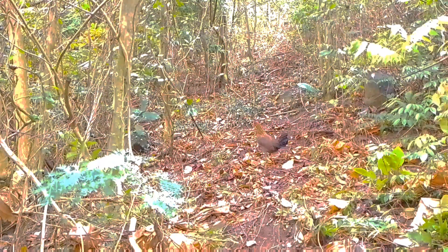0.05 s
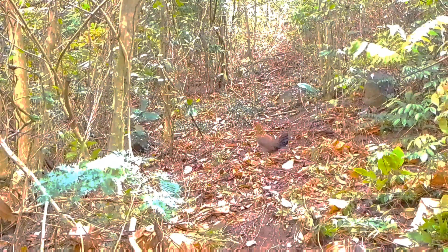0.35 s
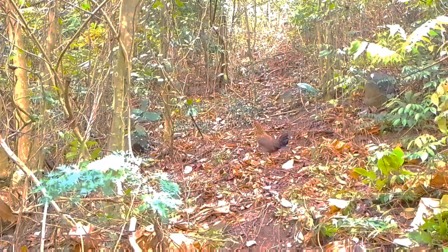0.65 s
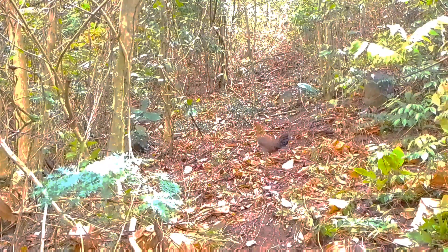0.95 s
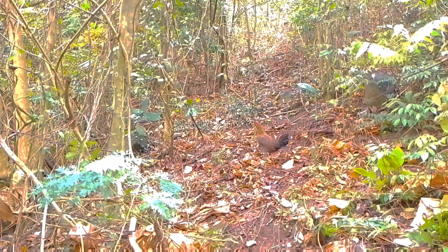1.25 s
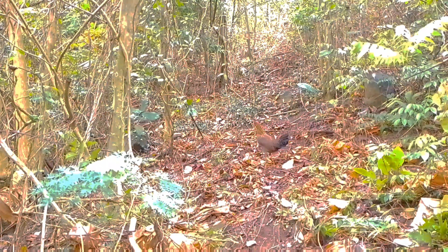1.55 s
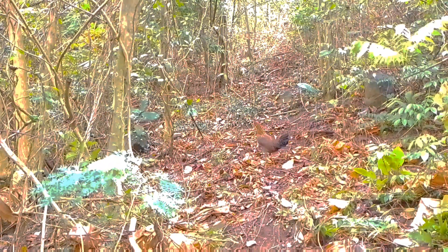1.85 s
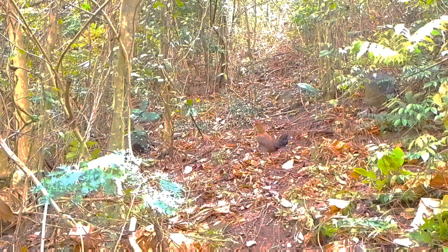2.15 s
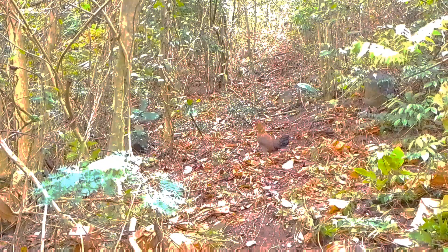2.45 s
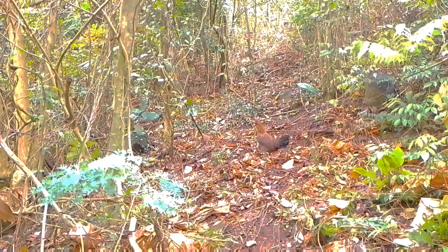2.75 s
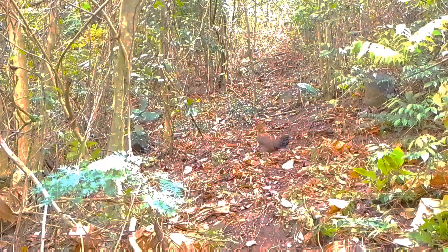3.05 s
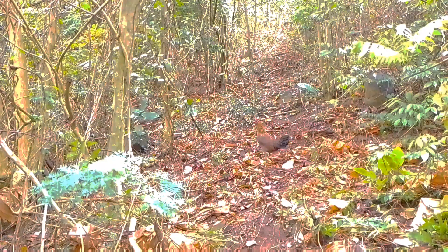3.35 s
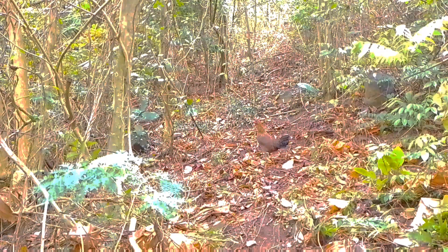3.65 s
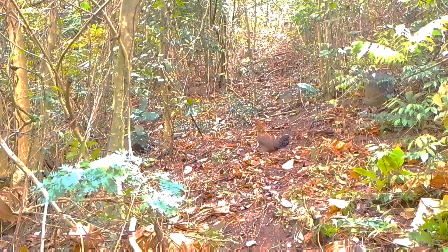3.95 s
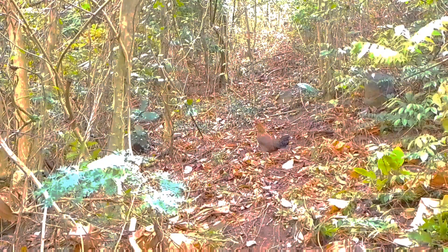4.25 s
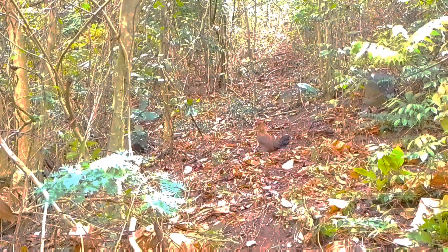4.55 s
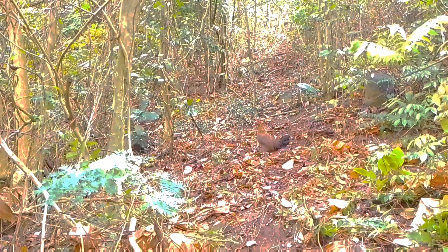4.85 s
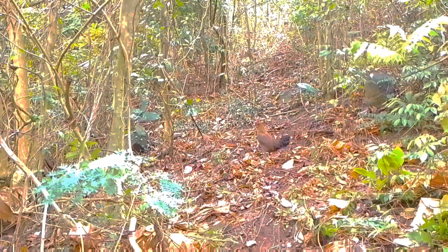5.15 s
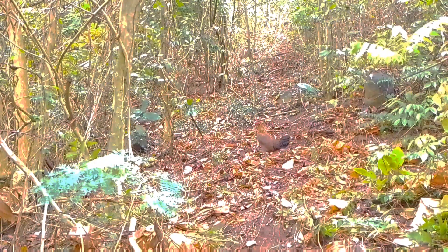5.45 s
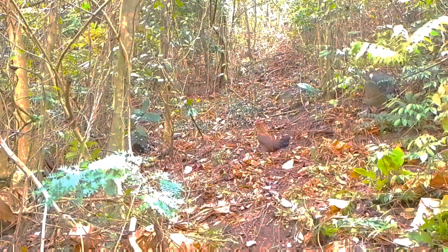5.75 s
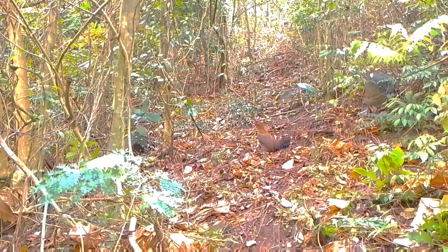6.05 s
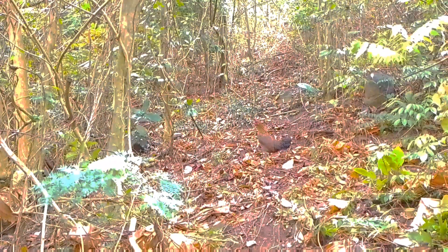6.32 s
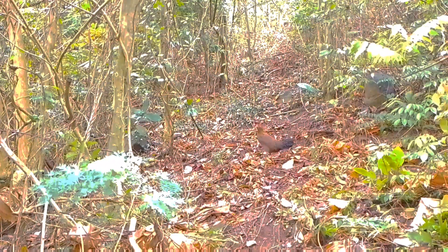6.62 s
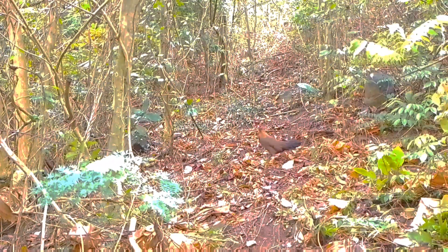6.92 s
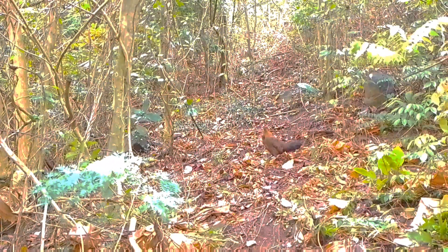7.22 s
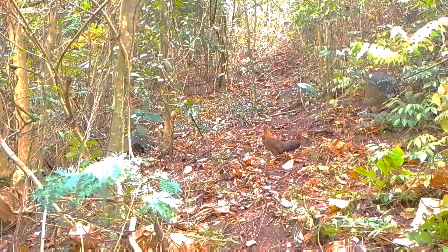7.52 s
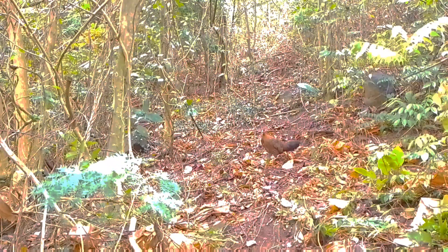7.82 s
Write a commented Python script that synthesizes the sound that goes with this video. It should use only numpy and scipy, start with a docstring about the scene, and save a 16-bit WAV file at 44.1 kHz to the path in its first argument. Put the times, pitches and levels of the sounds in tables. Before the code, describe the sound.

In a quiet forest, dry leaves tick softly and distant little birds give rising and falling whistles. Then a nearby junglefowl squeaks, swells from a whine to a hoarse scream lasting about a second, and runs on into loud, raspy cackling, fast at first and then more spaced out. The trees scatter the calls slightly, and a soft, even hush continues underneath.

```python
"""A junglefowl squeaks, draws a whine out into a harsh scream, then breaks into rapid, rasping
cackles that slow down. Small birds whistle farther off and dry leaves tick over a steady forest hush.
Scream and cackles are membrane pulses and chopped air, shaped by throat and beak. Squeak and whistles
are sine glides; leaves and hush are filtered noise. The trees scatter every call."""
import sys
import numpy as np
from scipy import signal
from scipy.fft import rfft, irfft, next_fast_len
from scipy.io import wavfile
from scipy.ndimage import map_coordinates

SR = 44100
rng = np.random.default_rng(int(sys.argv[2]) if len(sys.argv) > 2 else 0)


def inscribe(sig):
    """Save sig as 16-bit PCM at rate SR to the path in sys.argv[1].

    A 1-D sig is mono; a 2-D sig holds one channel per row.
    Samples are clipped to [-1, 1] before scaling.
    """
    pcm = np.round(np.clip(np.atleast_2d(sig).T, -1, 1) * 32767)
    wavfile.write(sys.argv[1], SR, pcm.astype(np.int16))


N = 356328

# Each row: time in seconds, pitch in Hz, relative level in dB, roughness (capped at 1 in use).
SCREAM_CONTOUR = [(4.6, 800, -36, 0.4), (4.625, 772.4, -33, 0.3), (4.705, 747.7, -25.5, 0.22),
                  (4.735, 781.4, -21, 0.18), (4.85, 807, -19.5, 0.16), (4.97, 841.8, -15.5, 0.45),
                  (5.1, 867, -13.5, 0.8), (5.2, 831, -12.5, 1.13), (5.49, 841, -11.5, 1.11),
                  (5.52, 820, -36, 1.25)]
# Extra pushes of air in the scream. Each row: centre in seconds, length in seconds, boost in dB.
SCREAM_SURGES = [(5.217, 0.0395, 5.5), (5.373, 0.0602, 4)]
# Each row: start in seconds, length in seconds, relative level in dB,
# onset pitch in Hz, settled pitch in Hz (both before the arch).
CACKLES = [(5.492, 0.063, -14.5, 889.5, 810), (5.553, 0.045, -12, 892, 791), (5.599, .045, -13, 844, 784.5),
           (5.643, 0.049, -14, 892, 796), (5.693, .059, -15.5, 911, 776), (5.751, 0.041, -11.5, 740, 832),
           (5.789, 0.058, -17, 745, 729), (5.837, 0.06, -16.5, 856, 787), (5.898, 0.046, -11, 855, 799),
           (5.947, 0.042, -13.5, 908, 796), (5.998, 0.04, -11.5, 840, 834), (6.036, 0.054, -19.5, 819, 774),
           (6.101, 0.046, -15, 872, 754), (6.18, 0.044, -15, 877, 713), (6.241, 0.039, -17.5, 757, 708),
           (6.302, 0.042, -14, 916, 789), (6.365, 0.033, -20, 802, 757), (6.416, 0.044, -18, 782, 728),
           (6.542, 0.048, -15.5, 821, 806), (6.662, 0.052, -17.5, 697, 755), (6.777, .068, -15.5, 857, 733),
           (6.919, 0.061, -17.5, 865, 699), (7.051, 0.071, -16.5, 901, 714), (7.196, 0.053, -18, 801, 688),
           (7.306, 0.048, -18, 842, 683), (7.432, 0.054, -15, 958, 762), (7.565, .054, -16, 970, 743.4),
           (7.699, 0.064, -16, 935, 715.5), (7.846, 0.061, -14, 1031, 854.5),
           (8.005, 0.06, -13.5, 980, 927)]
# Course of one cackle. Each row: fraction of its length, gain in dB, roughness factor.
CACKLE_SHAPE = [(0, -10, .45), (.08, -1.5, .85), (.2, .5, .8), (.45, 1, .45), (.78, -.5, 1.3), (1, -9, 1.3)]
# Each row: time in seconds, base roughness of a cackle starting then.
CACKLE_ROUGHNESS = [(5.5, 0.83), (6.03, 1.07), (6.12, 0.71), (6.7, 0.62), (7.06, 0.78), (7.3, 0.6),
                    (7.7, 0.63), (7.87, 1.17)]
# Fixed throat response. Each row: frequency in Hz, gain in dB.
THROAT_RESPONSE = [(150, -60), (420, -35), (650, -19.5), (780, -19.5), (1000, -18.5), (1230, -13.5),
                   (1430, -4.5), (1680, .5), (2130, -4.5), (2500, -15.5), (3300, -12.5), (9000, -20),
                   (15000, -26)]
# Tuning by the beak opening. Each row: time in seconds, resonance in Hz.
BEAK_RESONANCE = [(4.65, 5150), (5.05, 4720), (5.3, 4420), (5.75, 4330), (6.14, 3420), (6.6, 3120),
                  (6.81, 3880), (6.95, 4480), (7.08, 4720), (7.22, 4460), (7.6, 4360), (7.87, 4860)]
# Mouth response, beak at rest. Each row: multiple of the beak resonance, gain in dB.
MOUTH_RESPONSE = [(.6, -0.5), (.88, -0.5), (1.04, 2.5), (1.12, -18.5), (1.22, -22.5), (1.37, -5.5),
                  (1.56, -21), (1.83, -11.5), (2.3, -19.5), (2.9, -30.5)]
# Each row: start in seconds, length in seconds, level in dB, start, middle and end pitch in Hz.
SQUEAK_GLIDES = [(4.531, 0.056, -36.5, 3150, 3250, 3300), (4.576, .056, -28.5, 2950, 2550, 1500),
                 (4.604, 0.083, -30.5, 2337, 2300, 2140), (4.555, 0.14, -48.5, 5650, 5560, 5250)]
# Small birds' notes. Each row: start in seconds, length in seconds, level in dB before the fade.
RISE_NOTES = [(.47, .24, -44.5), (1.28, 0.27, -45), (2.09, 0.29, -43.5), (3, 0.28, -46), (3.92, .28, -44),
              (6.84, .3, -47.5)]
SLUR_NOTES = [(.27, .15, -38.5), (.78, .17, -43), (.95, .11, -49.5), (1.32, 0.16, -43), (1.8, 0.17, -47.5),
              (2.67, .1, -52), (2.79, .11, -56), (3.32, 0.1, -47.5), (3.86, .1, -49.5)]
CHIP_NOTES = [(.22, 0.065, -41.5), (1.02, 0.072, -44), (1.86, 0.078, -45.5), (2.765, 0.049, -41.5),
              (3.7, .08, -46), (7.91, 0.068, -45)]
# Each row: start in seconds, relative level in dB.
LEAF_TICKS = [(0.5605, -45), (1.5853, -39), (3.443, -43), (4.0741, -41)]
# Each row: frequency in Hz, relative spectral density in dB.
HUSH_SPECTRUM = [(25, -35.5), (60, -13.5), (110, -13), (165, -24.5), (215, -6), (380, -1), (600, -5),
                 (2700, -4.5), (4000, -12), (6000, -23.5), (9000, -32), (12500, -45)]
# Tail from the far trees. Each row: frequency in Hz, 60 dB decay time in seconds.
TREE_DECAY = [(1700, 0.43), (3500, 0.47), (9000, 0.55)]


def junglefowl(scream_db=10, cackle_db=13):
    """One scream, then a cackle per push of air, all through one vocal tract."""
    source = np.zeros(N)
    add(source, SCREAM_CONTOUR[0][0], amp(scream_db) * scream())
    for row in CACKLES:
        add(source, row[0], amp(cackle_db) * cackle(*row))
    return vocal_tract(source)


def scream(quaver=0.0399, flutter_db=1.0, crack_hz=271.5, lift_hz_per_db=14, clearing_per_db=.11):
    """A whine swells, turns hoarse and cracks upward once; extra pushes of air lift and clear it."""
    t = np.arange(SCREAM_CONTOUR[0][0], SCREAM_CONTOUR[-1][0], 1 / SR)
    pitch_hz, level_db, rough = curves(SCREAM_CONTOUR, t)
    push_db = sum(db * bump(t, centre_s, length_s) for centre_s, length_s, db in SCREAM_SURGES)
    crack = np.minimum(2 * bump(t, centre_s=4.985, length_s=.03), 1)
    rough = np.clip(rough - clearing_per_db * push_db, 0, 1)
    pitch_hz = pitch_hz + lift_hz_per_db * push_db + crack_hz * crack
    pitch_hz *= 1 + quaver * rough ** 2 * wobble(90, len(t))
    level_db = level_db + push_db + flutter_db * rough * wobble(69.2, len(t))
    return amp(level_db) * syrinx(pitch_hz, rough)


def cackle(start_s, length_s, level_db, onset_hz, settled_hz, settle_s=.009, release_s=.018):
    """One push of air: the pitch settles, arches and sags as the air runs out."""
    t = np.arange(SR // 10) / SR
    rough, = curves(CACKLE_ROUGHNESS, start_s)
    spent = np.minimum(t / length_s, 1)
    settling_hz = (onset_hz - settled_hz) * np.exp(-(t / settle_s) ** 2)
    arch_hz = -720.2 * (spent - .42) ** 2
    swell_db, strain = curves(CACKLE_SHAPE, spent)
    fade = np.exp(-np.maximum(t - length_s, 0) / release_s)
    return amp(level_db + swell_db) * fade * syrinx(settled_hz + settling_hz + arch_hz, rough * strain)


def syrinx(pitch_hz, rough, jitter=.055, beat_depth=.85, beat_hz=310, rasp=1.1, leak=.13):
    """Membrane pulses; driven hard, they stumble and chop the air into a rasp."""
    n = len(pitch_hz)
    rough = np.clip(rough, 0, 1)
    phase = phase_rad(pitch_hz * (1 + jitter * rough * wobble(700, n)))
    # Stretched high or blown gently, the membrane closes softly.
    softness = np.clip(np.maximum((pitch_hz - 770) / 130, 1.4 - rough / .25), 0, 1)
    # A second, unsteady vibration adds sidebands.
    beat = np.cos(phase_rad(beat_hz * (1 + .274 * wobble(300, n))))
    tone = membrane_pulses(phase, softness) * (1 + beat_depth * rough * beat)
    air = unit_rms(rng.standard_normal(n) * (1 + .5 * np.cos(phase)))
    return (tone + (rasp * rough ** 2 + leak) * air) / np.sqrt(1 + 2 * rough ** 2)


def membrane_pulses(phase, softness, mellow_db=-23, harmonics=16):
    """Softer closure gives a fuller fundamental and weaker upper partials."""
    fundamental = (.5 + .5 * softness) * np.cos(phase)
    upper = amp(mellow_db * softness) * sum(np.cos(k * phase) for k in range(3, harmonics + 1))
    return (fundamental + np.cos(2 * phase) + upper) / np.sqrt(harmonics / 2)


def vocal_tract(source, rest_hz=4240, upper_lag=1.83, muffle_hz=5970, muffle_db_per_octave2=21):
    """The throat rings at fixed pitches; the beak tunes the mouth and muffles treble as it closes."""
    def mouth_gain(hz, t):
        beak_hz, = curves(BEAK_RESONANCE, t)
        opening = beak_hz / rest_hz
        # Higher resonances move less than the beak's own.
        excess = np.maximum(hz / beak_hz - 1, 0) * opening ** upper_lag
        resonance_db = log_interp(MOUTH_RESPONSE, np.minimum(hz / beak_hz, 1) + excess)
        treble_octaves = np.log2(np.maximum(hz / muffle_hz, 1))
        return amp(resonance_db + muffle_db_per_octave2 * np.log2(opening) * treble_octaves)
    throat = filtered(source, lambda hz: minimum_phase(log_interp(THROAT_RESPONSE, hz)))
    return stft_filtered(throat, mouth_gain, frame_samples=512)


def squeak():
    """The junglefowl's voice catches in a thin, wavering squeak."""
    track = np.zeros(N)
    for start_s, length_s, level_db, *glide_hz in SQUEAK_GLIDES:
        add(track, start_s, whistle(length_s, level_db, glide_hz, waver=.026, flutter_db=.5))
    return track


def small_birds():
    """Rising whistles, falling slurs, short chips and one long, low dive."""
    track = np.zeros(N)

    def sing(notes, glide_hz, fade_db):
        for start_s, length_s, level_db in notes:
            note = whistle(length_s, level_db, glide_hz, waver=.008, flutter_db=1.54, fade_db=fade_db)
            add(track, start_s, note)
    sing(RISE_NOTES, glide_hz=(2818, 3280, 3400), fade_db=-.5)
    sing(SLUR_NOTES, glide_hz=(3130, 2690, 2360), fade_db=-1)
    sing(CHIP_NOTES, glide_hz=(2597, 2952, 3176), fade_db=-5.5)
    sing([(1.48, .41, -39.5)], glide_hz=(2166, 1650, 952), fade_db=7.5)
    return track


def whistle(length_s, level_db, glide_hz, waver, flutter_db, fade_db=0):
    """A trembling sine glide through start, middle and end pitch; a negative fade swells."""
    n = int(length_s * SR)
    progress = np.linspace(0, 1, n)
    pitch_hz = np.polyval(np.polyfit([0, .5, 1], glide_hz, 2), progress)
    pitch_hz *= 1 + waver * wobble(156.7, n)
    gain = amp(level_db - fade_db * progress + flutter_db * wobble(70.2, n))
    return signal.windows.tukey(n, .35) * gain * np.sin(phase_rad(pitch_hz))


def leaves(gain_db=-8, t60_s=.025):
    """Brief dry snaps in the leaf litter."""
    track = np.zeros(N)
    t = np.arange(SR // 20) / SR
    for start_s, level_db in LEAF_TICKS:
        add(track, start_s, amp(level_db + gain_db - 60 * t / t60_s) * rng.standard_normal(len(t)))
    return filtered(track, lambda hz: log_interp([(500, .1), (3500, 1.3), (14000, .35)], hz))


def forest_echo(x, near_db, far_db, near_t60_s=.1):
    """Ground and near trunks scatter a call at once; far trees add a longer tail."""
    def tail_gain(hz, t):
        return amp(-60 * t / log_interp(TREE_DECAY, hz))
    near = rng.standard_normal(SR) * amp(-60 * np.arange(SR) / SR / near_t60_s)
    far = stft_filtered(rng.standard_normal(SR), tail_gain, frame_samples=256)
    echo = amp(near_db) * near / np.linalg.norm(near) + amp(far_db) * far / np.linalg.norm(far)
    return x + signal.fftconvolve(x, echo)[:N]


def hush(level_db=-42.5):
    """The even rustle of the surrounding forest."""
    rustle = filtered(rng.standard_normal(N), lambda hz: amp(log_interp(HUSH_SPECTRUM, hz)))
    return amp(level_db) * unit_rms(rustle)


def amp(db):
    return 10 ** (np.asarray(db) / 20)


def unit_rms(x):
    return x / np.sqrt(np.mean(x ** 2) + 1e-20)


def phase_rad(hz):
    return 2 * np.pi * np.cumsum(hz) / SR


def log_interp(points, hz):
    """Interpolate on a log frequency axis."""
    knots, values = np.transpose(points)
    return np.interp(np.log(hz + 1e-6), np.log(knots), values)


def curves(rows, t):
    """Each column after the first, interpolated at t."""
    knots, *columns = np.transpose(rows)
    return [np.interp(t, knots, column) for column in columns]


def wobble(knots_per_s, n):
    """Smooth random curve, n samples."""
    knots = rng.standard_normal(int(n * knots_per_s / SR) + 4)
    return map_coordinates(knots, [np.arange(n) * knots_per_s / SR])


def bump(t, centre_s, length_s):
    """Smooth rise from 0 to 1 and back."""
    return np.cos(np.pi * np.clip((t - centre_s) / length_s, -.5, .5)) ** 2


def filtered(x, response):
    """Apply response(hz)."""
    size = next_fast_len(N + SR // 2)
    return irfft(rfft(x, size) * response(np.fft.rfftfreq(size, 1 / SR)), size)[:N]


def stft_filtered(x, gain, frame_samples):
    """Apply gain(hz, t)."""
    hz, t, spectra = signal.stft(x, SR, nperseg=frame_samples)
    return signal.istft(spectra * gain(hz[:, None], t), SR, nperseg=frame_samples)[1][:len(x)]


def minimum_phase(gain_db):
    """Response of a resonator that rings only after it is struck."""
    cepstrum = irfft(np.log(amp(gain_db)))
    half = len(cepstrum) // 2
    return np.exp(rfft(np.r_[cepstrum[0], 2 * cepstrum[1:half], np.zeros(half)]))


def add(track, start_s, sound):
    part = track[round(start_s * SR):][:len(sound)]
    part += sound[:len(part)]


def scene():
    """Junglefowl and leaves close by, small birds deeper among the trees; mono."""
    close = forest_echo(junglefowl() + squeak() + leaves(), near_db=-9, far_db=-19)
    distant = forest_echo(small_birds(), near_db=.5, far_db=.5)
    return (close + distant + hush())[None]


def record(dry):
    """Brick-wall low-pass."""
    cutoff_hz = 15600
    return filtered(dry[0], lambda hz: hz < cutoff_hz)[None]


dry = scene()
out = record(dry)
inscribe(out)
```